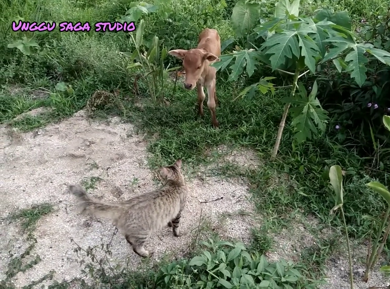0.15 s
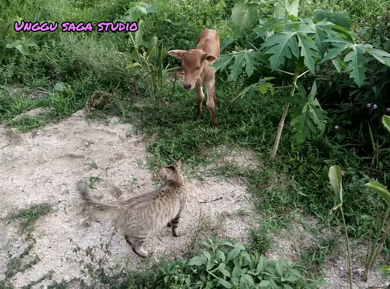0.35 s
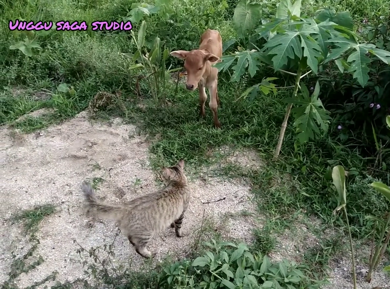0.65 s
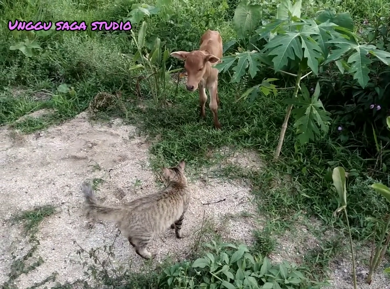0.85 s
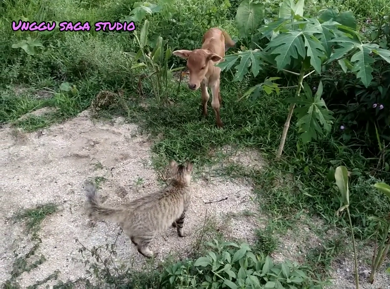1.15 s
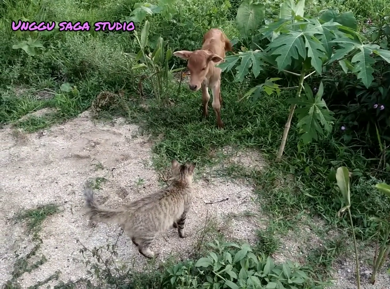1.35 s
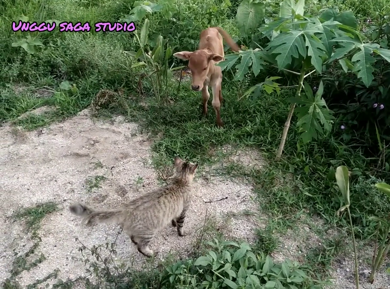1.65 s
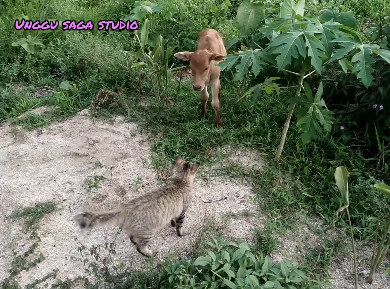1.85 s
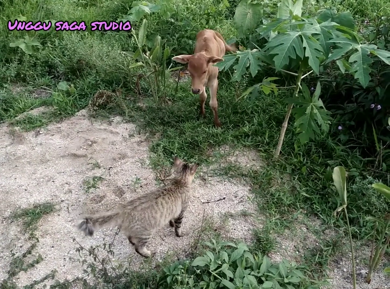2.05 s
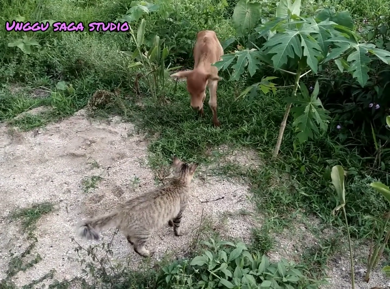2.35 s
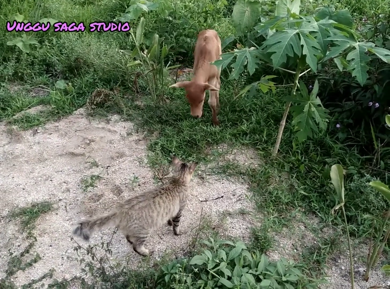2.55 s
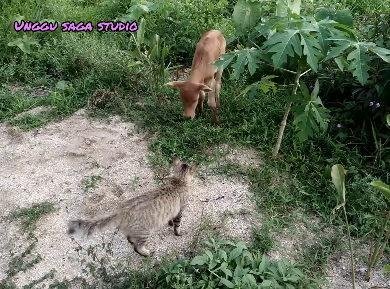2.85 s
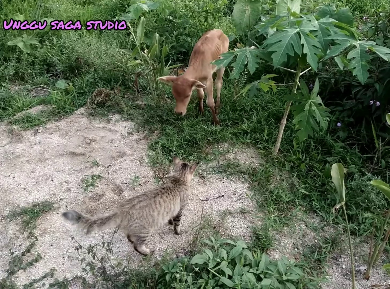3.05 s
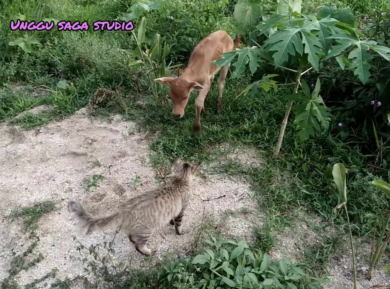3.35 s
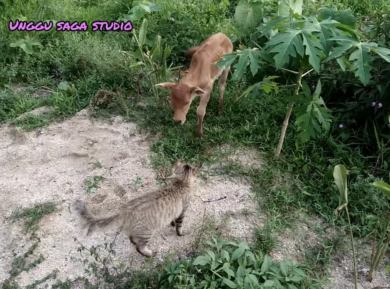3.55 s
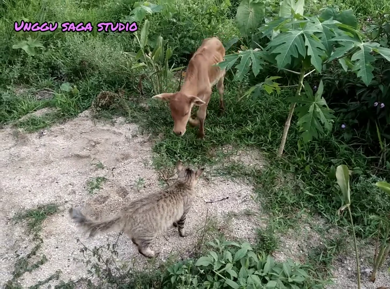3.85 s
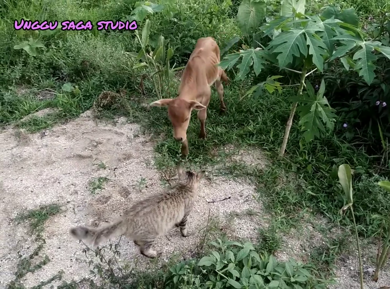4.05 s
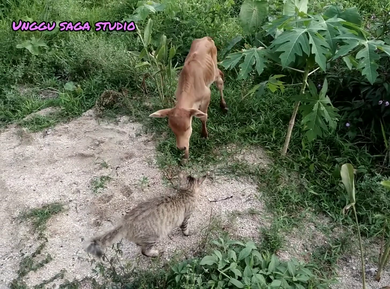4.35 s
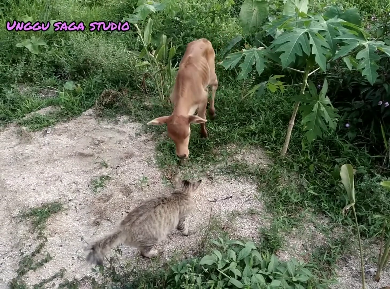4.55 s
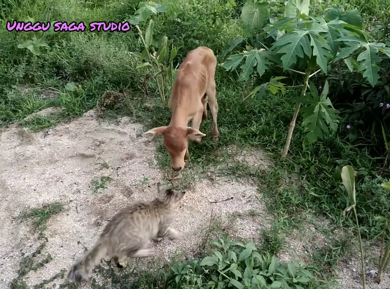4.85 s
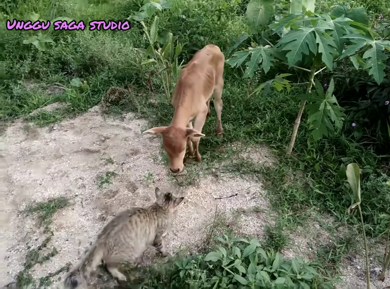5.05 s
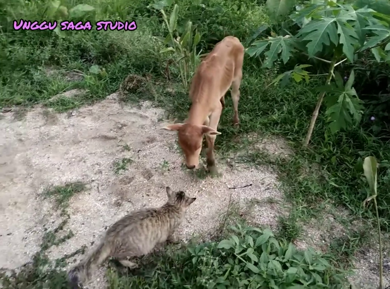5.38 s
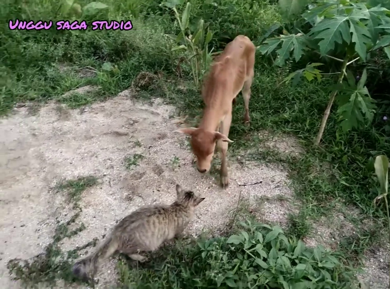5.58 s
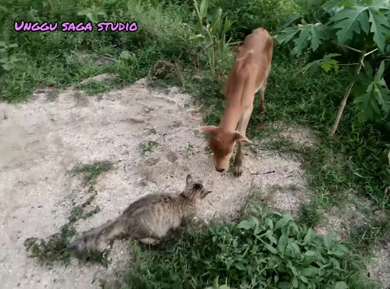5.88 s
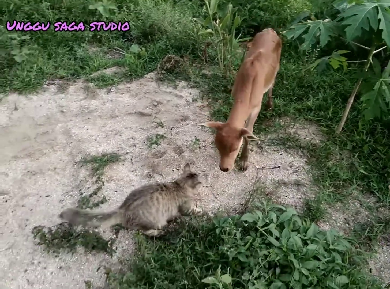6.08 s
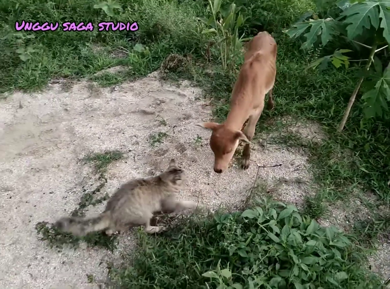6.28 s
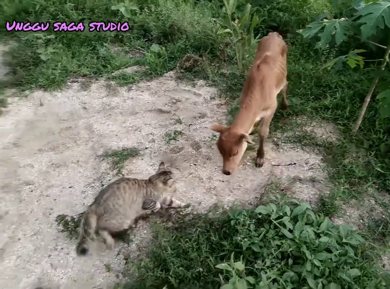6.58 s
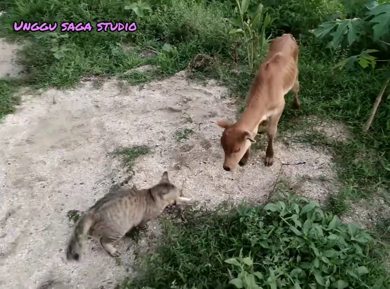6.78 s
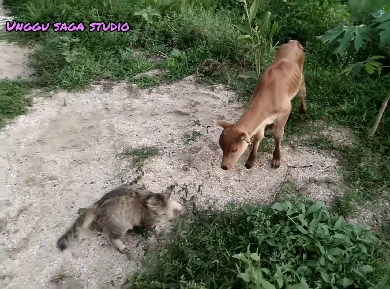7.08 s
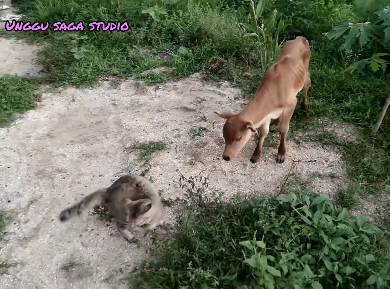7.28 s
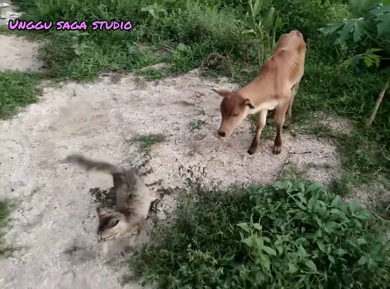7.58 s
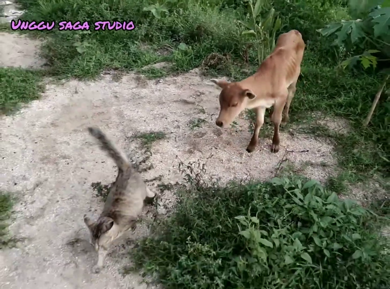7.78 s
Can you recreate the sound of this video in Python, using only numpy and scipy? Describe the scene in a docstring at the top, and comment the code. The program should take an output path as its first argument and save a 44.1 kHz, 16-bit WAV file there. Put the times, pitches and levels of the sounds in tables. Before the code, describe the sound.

Dense high insect trilling fills an open weedy yard, with faint bird chips and rustling weeds, then gravelly scrapes and sharp little clicks.

```python
"""Tree crickets drone in a grassy yard: wings ring at rising pitches with a shrill fourth harmonic, then stutter.
Behind them noise strands blur into a chorus, a katydid's toothed file buzzes and shaped noise makes fizz and air.
Small birds chip in falling glides, blurred glides call from afar, and two close low notes beat as an engine.
Animals stir the weeds as random grains; near the end a cat and a calf scuff sand, with resonant gravel and
sharp clicks."""
import sys
import numpy as np
from scipy import signal
from scipy.fft import rfft, irfft, next_fast_len
from scipy.io import wavfile

SR = 44100
rng = np.random.default_rng(int(sys.argv[2]) if len(sys.argv) > 2 else 0)


def store_wav(level_fs):
    """Save 16-bit WAV to argv[1]."""
    pcm = np.round(np.clip(np.atleast_2d(level_fs), -1, 1) * 32767)
    wavfile.write(sys.argv[1], SR, pcm.T.astype(np.int16))


N = 349568
TIME = np.arange(N) / SR
BINS = np.fft.rfftfreq(N, 1 / SR)

# Spectrum of rubbed sand and cracking grit. Each row: frequency in Hz, relative level in dB.
SAND_SPECTRUM = [(100, -9), (450, -8), (680, -3), (900, 4.5), (1400, 2), (2050, 6.5), (2900, 4.5),
                 (3700, -10.5), (4800, -31), (6100, -32), (7200, -1), (13500, -15)]
# Spectrum of crunching and snapping stalks. Each row: frequency in Hz, relative level in dB.
STALK_SPECTRUM = [(150, -8), (500, -8), (800, -8), (1300, 0.5), (2800, 6.5), (3600, 7), (4250, 1.5),
                  (4700, -1.5), (5400, -8), (6100, -16), (7000, -20), (11000, -51)]


def amp(db):
    """Level to amplitude: 20 dB is a factor of ten."""
    return 10 ** (np.asarray(db) / 20)


def unit(x):
    """Normalization of the mean power: scales to rms 1."""
    return x / np.sqrt(np.mean(abs(x) ** 2) + 1e-20)


def curves(rows):
    """Linear interpolation in time: the columns of a table at every sample."""
    s, *columns = np.transpose(rows)
    return [np.interp(TIME, s, c) for c in columns]


def colour(rows):
    """Interpolation over log frequency: the columns of a table at every bin."""
    hz, *columns = np.transpose(rows)
    return [np.interp(np.log(BINS + 1), np.log(hz + 1), c) for c in columns]


def pan(lean_db):
    """Interaural level difference: left and right gains for a left-minus-right level."""
    return amp(np.array([[.5], [-.5]]) * lean_db)


def add(mix, s, sound):
    """Superposition: mixes a sound in at time s."""
    part = mix[..., max(round(s * SR), 0):][..., :sound.shape[-1]]
    part += sound[..., :part.shape[-1]]


def drift(width_hz):
    """Narrowband fluctuation: low-passed complex noise of rms 1, independent in each ear."""
    rate_hz = 12 * width_hz  # a coarse sampling suffices for slow noise
    hz = np.fft.fftfreq(next_fast_len(int(rate_hz * N / SR) + 8), 1 / rate_hz)
    z = rng.standard_normal((2, len(hz))) + 1j * rng.standard_normal((2, len(hz)))
    z = np.fft.ifft(z / (1 + (hz / width_hz) ** 4))
    return unit(np.array([np.interp(TIME * rate_hz, np.arange(len(hz)), ear) for ear in z]))


def turn(hz):
    """Phase is the integral of frequency: a unit phasor that follows a pitch curve."""
    return np.exp(2j * np.pi * np.cumsum(hz * np.ones(N)) / SR)


def tinted(x, gain):
    """Linear filtering: multiplies the spectrum by a gain at every frequency."""
    return irfft(rfft(x) * gain, N)


def bed(rows, swell_db):
    """Diffuse field: noise of a given spectral density whose ears correlate only at low frequencies."""
    # Each row: frequency in Hz, correlation between the ears.
    likeness = [(30, 0.25), (90, 0.86), (200, 0.38), (600, 0.41), (1200, 0), (15000, 0)]
    db, lean_db = colour(rows)
    same = np.clip(colour(likeness)[0], -1, 1)
    a, b = rfft(rng.standard_normal((2, N)))
    z = np.array([a, same * a + np.sqrt(1 - same ** 2) * b])
    noise = irfft(z * amp(db) * pan(lean_db), N) * np.sqrt(SR / 2)  # density to amplitude
    return noise * amp(swell_db * drift(10.2)[0].real)


def air():
    """Broadband ambient noise: still air and far leaves, gently fluctuating."""
    # Each row: frequency in Hz, density in dB per Hz before the swell, left-right difference in dB.
    density = [(20, -114, 11), (44.2, -94, -2), (111, -87, 6), (209, -91.5, 5), (423, -92.5, 5.5),
               (590, -94, -2), (944, -94, 1.5), (1456, -99, 1), (2250, -91, 11), (2420, -93.5, 22),
               (2860, -101, 5.5), (3230, -101, -3.5), (4300, -106, -2.5), (4540, -100, 9.5),
               (5000, -102, -4.5), (6000, -116, 5)]
    return bed(density, swell_db=1.4)


def engine(waver=0.27, whine_hz=935, whine_db=-72.0):
    """Beating: two close low notes throb at their difference frequency under a blurred whine."""
    # Each row: frequency in Hz, level in dB relative to the engine's level.
    low_notes = [(76.6, -9.5), (87.2, -3.5)]
    start_db, approach_db_per_s = -66.5, 0.93
    notes = sum(amp(db) * turn(hz) * (1 + waver * drift(1.8)) for hz, db in low_notes) * pan(3.7)
    whine = turn(whine_hz) * drift(50) * amp(whine_db + 2.3 * drift(3).real)
    return (notes * amp(start_db + approach_db_per_s * TIME) + whine).real


def far_calls():
    """Spectral blurring by distance: evenly repeated gliding calls, modulated by narrowband noise."""
    # Far birds and farm animals. Each row: start in seconds, number of calls, gap between starts in seconds,
    # length in seconds, first pitch in Hz, last pitch in Hz, level in dB, blur width in Hz.
    calls = [(0, 2, 0.367, 0.18, 556, 540, -62, 55), (0.1, 3, .45, 0.4, 1298, 1447, -62.5, 130),
             (1.299, 1, 1, 2.2, 5000, 5200, -67.5, 350), (2.1, 1, .9, .95, 3230, 3680, -68, 110),
             (2.13, 2, .18, .15, 2850, 2720, -59, 170), (2.76, 1, .2, .14, 2680, 2850, -58, 150),
             (3.17, 1, .2, .13, 3400, 3300, -63, 170), (3.21, 1, .2, .14, 2950, 2720, -56, 150),
             (4.64, 1, .6, .4, 290, 205, -64, 20), (4.68, 1, .6, .55, 565, 325, -59.5, 38),
             (5.356, 2, .345, .135, 552, 547, -61, 70)]
    out = np.zeros((2, N))
    for s, count, gap, length, first_hz, last_hz, db, blur_hz in calls:
        blur = drift(blur_hz)
        for k in range(round(count)):
            u = np.clip((TIME - s - k * gap) / length, 0, 1)
            glide = turn(first_hz + (last_hz - first_hz) * u)
            out += amp(db) * np.sin(np.pi * u) * (blur * glide).real
    return out


def leaves(x, wet_db, t60):
    """Exponential decay of scattered energy: a short reverberation off leaves and ground."""
    t = np.arange(SR // 2) / SR
    tail = rng.standard_normal((2, len(t))) * amp(-60 * t / t60)
    tail /= np.linalg.norm(tail[0])
    return amp(wet_db) * signal.fftconvolve(x, tail, axes=1)[:, :N]


def birds(length=0.019, fall_hz=950, near_db=-48.5, stretch=.09):
    """Direct-to-scattered ratio: fast falling chips grow along a phrase; faint ones sit deeper in the bushes."""
    # Each row: start in seconds, number of chips, level of the first chip in dB before
    # the direct and scattered shares, starting pitch in Hz.
    phrases = [(2.04, 1, -61, 5600), (2.507, 1, -50.5, 5780), (2.696, 2, -50, 5800),
               (2.851, 3, -50.5, 5800), (4.05, 1, -60, 5450), (4.266, 2, -55.5, 5480),
               (4.513, 2, -57.5, 5500), (6.372, 2, -56.5, 5560), (6.615, 2, -56, 5580),
               (6.858, 2, -56.5, 5560), (7.092, 2, -56.5, 5600), (7.372, 2, -56.5, 5560)]
    gap_s, growth_db = .036, 3  # from chip to chip
    direct, scattered = np.zeros(N), np.zeros(N)
    for s, count, first_db, hz in phrases:
        for k in range(round(count)):
            t = np.arange(0, length * (1 + stretch * k), 1 / SR)
            db, fall = first_db + k * growth_db, fall_hz * rng.uniform(0.86, 1.22)
            phase = 2 * np.pi * np.cumsum(hz - fall * t / length) / SR
            chip = amp(db) * np.hanning(len(t)) * np.sin(phase)
            clear = np.clip(amp(db - near_db), 0, 1) ** 2  # louder chips reach the ear more directly
            add(direct, s + k * gap_s, chip * clear)
            add(scattered, s + k * gap_s, chip * (1.35 - clear))
    return direct + leaves(scattered[None], wet_db=1.5, t60=.19)


def fizz():
    """Incoherent summation: countless small insects in the grass merge into shaped noise."""
    # Each row: frequency in Hz, density in dB per Hz before the swell, left-right difference in dB.
    density = [(5200, -135, 9), (6470, -114, 2), (6330, -94, 2), (7090, -101, -1.5), (7380, -85.5, 3),
               (7410, -101.5, -2), (8140, -89, 2), (8900, -85.5, 1), (9300, -81.5, -1.5), (11370, -88, 1),
               (11350, -106, -3), (13500, -108, 15.5), (14800, -104, 18)]
    return bed(density, swell_db=1.63)


def katydid(stroke_db=-4.0, scatter_db=-3.5, jitter_hz=70, uneven_db=1.5):
    """Stridulation: file strokes whistle and fall ever faster; shaped noise stands for their scatter in grass."""
    # Colour of the buzz and its hiss. Each row: frequency in Hz, gain in dB, left-right difference in dB;
    # the direct strokes take only the difference.
    hiss_colour = [(9200, -45, 0), (10150, -11, 1.9), (10500, -4.5, 6), (10880, -4.5, 16.5),
                   (11260, -1, 8.5), (11560, -14.5, 7), (12400, -34, 7), (13100, -77, 12)]
    # Each row: time in seconds, level in dB before the stroke and scatter shares.
    loudness = [(0, -48.5), (4.4, -48), (5, -47.5), (5.75, -48.5), (6.15, -49.5), (6.5, -48), (6.8, -47),
                (7.3, -46.5), (7.93, -47.5)]
    rate_hz, stroke_s = 136.9, .0037
    top_hz, drop_hz = 11390, 1753
    cycles = np.cumsum(rate_hz + .3 * drift(3)[0].real) / SR
    number = cycles.astype(int)
    detune, size, start = rng.standard_normal((number[-1] + 1, 3))[number].T
    u = np.minimum(cycles % 1 / rate_hz / stroke_s, 1)  # progress of a stroke, then silence
    pitch_hz = top_hz + jitter_hz * detune - drop_hz * u ** 2
    whistles = (turn(pitch_hz) * np.exp(2j * np.pi * start)).real
    db, lean_db = colour(hiss_colour)
    direct = unit(tinted(whistles * np.sin(np.pi * u) * amp(uneven_db * size), pan(lean_db)))
    scatter = unit(tinted(rng.standard_normal((2, N)), amp(db) * pan(lean_db)))
    return (amp(stroke_db) * direct + amp(scatter_db) * scatter) * amp(curves(loudness)[0])


def granular(grains_per_s, hiss, lumpy_db):
    """Shot noise: sparse random grains over a steady hiss, partly shared by the ears, in uneven clumps."""
    grains = rng.standard_normal((3, N)) * (hiss + (rng.random((3, N)) < grains_per_s / SR))
    return (grains[:2] + grains[2]) * amp(lumpy_db * drift(45)[0].real)


def rubbing(spectrum, grains_per_s, hiss, lumpy_db):
    """Friction noise: clumps of tiny grains filtered by the material, rms 1."""
    return unit(tinted(granular(grains_per_s, hiss, lumpy_db), amp(colour(spectrum)[0])))


def strokes(rows):
    """Amplitude envelope: the force of each stroke of a foot over time."""
    force = np.zeros(N)
    for s, length, db in rows:
        add(force, s, amp(db) * signal.windows.tukey(int(length * SR), .4))
    return force


def rustle():
    """Friction in vegetation: stalks crunch and fine blades brush as the animals move."""
    # The calf and the cat brush through the weeds. Each row: start in seconds, length in seconds,
    # level of stalks in dB, level of fine blades in dB, both before the faint constant stir and the panning.
    brushes = [(1.622, 0.27, -66, -63), (2.36, 0.48, -74, -68), (3.174, 0.27, -66, -66),
               (3.385, 0.11, -67, -61), (3.52, 0.43, -71, -67), (4.217, 0.6, -68, -69),
               (4.747, 0.34, -62.5, -63), (5.62, .14, -65, -65), (5.816, 0.66, -62.5, -66),
               (6.425, 0.3, -59.5, -64), (6.75, 0.39, -64, -70), (7.072, 0.17, -61.5, -61),
               (7.223, 0.26, -63, -72), (7.667, 0.35, -63, -72)]
    # Fine blades. Each row: frequency in Hz, relative level in dB.
    blade_spectrum = [(3000, -30), (6100, -18), (7000, 2), (9500, 4), (12500, 1), (14200, 0)]
    grazing_stalks_db, grazing_blades_db = -73, -87  # the faint stir between those moves
    s, length, stalks_db, blades_db = np.transpose(brushes)
    bend = np.hypot(strokes(zip(s, length, stalks_db)), amp(grazing_stalks_db))
    sweep = np.hypot(strokes(zip(s, length, blades_db)), amp(grazing_blades_db))
    stalks = rubbing(STALK_SPECTRUM, grains_per_s=1100, hiss=0.56, lumpy_db=3.5) * bend * pan(1)
    blades = rubbing(blade_spectrum, grains_per_s=960, hiss=0.34, lumpy_db=5.5) * sweep * pan(23.4)
    return stalks + blades


def thuds():
    """Damping by soft ground: hoof falls in turf give low, dull bursts of friction noise."""
    # Each row: start in seconds, length in seconds, level in dB before panning.
    falls = [(1.33, 0.16, -62), (1.77, 0.11, -67), (7.25, 0.094, -68)]
    # Turf. Each row: frequency in Hz, relative level in dB.
    turf_spectrum = [(60, -23), (150, 1.5), (240, -2.5), (400, -9), (700, -20), (2000, -40)]
    turf = rubbing(turf_spectrum, grains_per_s=980, hiss=0.6, lumpy_db=5.5)
    return strokes(falls) * turf * pan(3.8)


def scuffs():
    """Granular friction: paws and hooves rub over sand in short strokes."""
    # Each row: start in seconds, length in seconds, level in dB before panning.
    steps = [(6.3, 0.058, -57.5), (6.518, 0.069, -52), (6.68, 0.089, -62), (6.86, 0.23, -62.5),
             (7.08, 0.11, -59), (7.255, 0.11, -57), (7.33, .11, -56.5), (7.42, 0.17, -58.5),
             (7.6, 0.047, -54.5), (7.655, .06, -50.5), (7.725, 0.05, -54), (7.775, 0.043, -56),
             (7.83, 0.18, -56)]
    sand = rubbing(SAND_SPECTRUM, grains_per_s=700, hiss=0.095, lumpy_db=1.0)
    return strokes(steps) * sand * pan(5.1)


def resonate(x, hz, width_hz):
    """Resonance: a double pole, carried along a pitch curve, rms 1."""
    carrier, r = turn(hz), np.exp(-np.pi * width_hz / SR)
    shifted = signal.lfilter([1], [1, -2 * r, r * r], x / carrier)
    return unit((carrier * shifted).real)


def drag(slips_per_s=800, hiss=0.063, lumpy_db=1):
    """Stick-slip excitation: gravel under the turning cat's paw rasps in a rising and a hollow low resonance."""
    start_s, length_s, level_db = 7.252, .092, -47.3
    first_hz, rise_hz_per_s, width_hz = 1820, 8000, 500
    hollow_hz, hollow_width_hz, hollow_db = 890, 580, -5.5
    slips = granular(slips_per_s, hiss, lumpy_db)
    hz = first_hz + rise_hz_per_s * np.clip(TIME - start_s, 0, length_s)
    rasp = resonate(slips, hz, width_hz)
    hollow = amp(hollow_db) * resonate(slips, hollow_hz, hollow_width_hz)
    return (rasp + hollow) * strokes([(start_s, length_s, level_db)]) * pan(4)


def crack(spectrum):
    """Minimum phase: the folded cepstrum packs a given spectrum into one sharp click, peak 1."""
    cepstrum = irfft(colour(spectrum)[0] * np.log(10) / 20, N)
    cepstrum[1:N // 2] *= 2
    cepstrum[N // 2:] = 0
    click = irfft(np.exp(rfft(cepstrum)), N)[:SR // 20]
    return click / abs(click).max()


def ticks():
    """Impulsive fracture: grains of grit crack dully and stalks snap brightly."""
    # Each row: time in seconds, peak level in dB before panning, brightness from 0 (grit) to 1 (stalk).
    snaps = [(6.145, -34, 0.84), (6.235, -43, .3), (6.248, -44, .3), (6.327, -42, 0), (6.331, -40, .2),
             (6.528, -37, .4), (6.541, -34, 0.43), (6.55, -40, .3), (6.556, -37, .2), (6.565, -39, 0),
             (6.577, -42, .1), (6.724, -44, .1), (6.942, -41, .4), (6.99, -40, .2), (7.14, -37, .2),
             (7.264, -38, 0), (7.284, -39, .1), (7.299, -39, .1), (7.312, -41, .1), (7.329, -39, .2),
             (7.501, -43, .1), (7.561, -42, 0), (7.68, -35.5, 0.24), (7.702, -43, 0), (7.787, -43, 0),
             (7.806, -33.5, 0.25), (7.848, -48, .1)]
    out, grit, stalk = np.zeros(N), crack(SAND_SPECTRUM), crack(STALK_SPECTRUM)
    for s, db, bright in snaps:
        click = (1 - bright) * grit + bright * stalk
        add(out, s, amp(db) * click / abs(click).max())
    return out * pan(3)


def chorus(whistle_db=1, overtone_db=0.0, right_db=-15, skirt_db=-18, patchy_db=8.0, count=9):
    """Narrowband noise from many sources: whistles blur into one band, harmonics stay as fading strands."""
    # The far singers together. Each row: time in seconds, level in dB of the whistle band before
    # whistle_db and right_db are added, level in dB of the strands.
    loudness = [(0, -48, -49.5), (1.4, -51.5, -54), (2.3, -48, -53), (3.2, -54.5, -53), (4.4, -54, -52),
                (5.4, -53, -51), (6.2, -50.5, -49.5), (7.93, -51.5, -46)]
    strand_width_hz = 16
    hz = 2222 + 13 * TIME  # a rise of 13 Hz per second
    low_db, high_db = curves(loudness)
    band = drift(100) + amp(skirt_db) * drift(300)
    whistle = turn(hz) * band * amp(low_db + whistle_db) * amp([[0], [right_db]])
    strands = 0
    for ratio in np.linspace(.955, 1.035, count):
        strand = turn(4 * hz * ratio) * drift(strand_width_hz)
        strands = strands + strand * amp(patchy_db * drift(2.4).real)
    return (whistle + unit(strands) * amp(high_db + overtone_db)).real


def pips(length=.055, overtone_db=-3, rise_hz_per_s=1100, uneven_db=1.4):
    """Frequency-modulated pulses: crickets stutter in runs of short rising notes with a fourth harmonic."""
    # Later runs slow as the two nearest singers wind down. Each row: centre of the first pip in seconds,
    # number of pips, gap in seconds, mean pitch in Hz, mean level in dB before panning.
    runs = [(.012, 2, 0.058, 2360, -58), (.232, 2, .112, 2328, -64), (.482, 5, 0.15, 2336, -59),
            (1.437, 1, .2, 2334, -58.5), (1.17, 2, .43, 2065, -60), (1.78, 4, 0.174, 2085, -59),
            (2.62, 4, 0.16, 2090, -59), (3.46, 4, .35, 2080, -61), (4.93, 3, 0.43, 2070, -61),
            (5.876, 13, 0.062, 2317, -56.5), (6.73, 6, .089, 2313, -57), (7.298, 6, .111, 2322, -57),
            (6.24, 9, 0.058, 2391, -58), (6.783, 7, .074, 2388, -58.5), (7.305, 7, .094, 2391, -56.5)]
    out, t = np.zeros((2, N)), np.arange(0, length, 1 / SR)
    for s, count, gap, hz, db in runs:
        for k, (detune, size) in enumerate(rng.standard_normal((round(count), 2))):
            pitch_hz = hz * (1 + 0.0032 * detune) + rise_hz_per_s * (t - length / 2)
            phase = 2 * np.pi * np.cumsum(pitch_hz) / SR
            note = np.sin(phase) * pan(19.7) + amp(overtone_db) * np.sin(4 * phase)
            pip = amp(db + uneven_db * size) * np.hanning(len(t)) * note
            add(out, s + k * gap - length / 2, pip)
    return out


def singer(row, swell_db, right_db=-16, above_db=-25, below_db=-10.5, lag=2.04):
    """Harmonics and sidebands: a wing rings at a rising pitch and its fourth harmonic, rippled and scattered."""
    attack_s, release_s, ripple_hz = 0.18, 0.17, 280
    flutter, scatter = .035, .3  # random share of the whistle, and of the overtone among swaying leaves
    start, end, first_hz, rise, bend, low_db, high_db = row
    age = TIME - start
    gate = np.clip(age / attack_s, 0, 1) * np.clip((end - TIME) / release_s, 0, 1)
    wing = turn(first_hz + rise * age + bend * age ** 2)
    ripple = turn(ripple_hz)
    # The ripple puts a side tone above the whistle and one below the overtone.
    whistle = wing * (1 + amp(above_db) * ripple) * (1 + flutter * drift(25)) * amp(low_db + swell_db[0])
    overtone = wing ** 4 * (1 + scatter * drift(10) + amp(below_db) * drift(9.5) / ripple)
    overtone = overtone * amp(high_db + swell_db[1])
    # The overtone reaches the right ear lag radians later in its cycle, the whistle half as much.
    ears = np.exp(-1j * lag * np.array([[0], [1]]))
    return gate * (np.sqrt(ears) * whistle * amp([[0], [right_db]]) + ears * overtone * pan(-1.7)).real


def crickets(sway_db=2, sway_hz=1.2):
    """Interference of near tones: three nearest crickets swell and beat; the rest waver behind leaves."""
    # The first three are the nearest. Each row: start in seconds, end in seconds, first pitch in Hz,
    # rise in Hz per second, bend of the rise in Hz per second squared, then the levels in dB of
    # whistle and overtone before their swells and ear gains.
    songs = [(.5, 6.15, 2255.4, 11.4, .14, -44, -45.2), (1.65, 6.25, 2310.8, 34.8, -3.25, -46.5, -49.6),
             (4.5, 8.2, 2160.9, 12.9, .4, -52, -53.5), (-.2, 6.3, 2166.8, 16.4, -.77, -55.5, -58),
             (-.2, 4.85, 2203.4, 14.7, -.33, -53.5, -55), (2.3, 6.15, 2155.5, 8.4, -.5, -61, -53.5)]
    # Swells of the three nearest: the first comes and goes, the second eases off, the third sinks back.
    # Each row: time in seconds, whistle change in dB, overtone change in dB.
    lead_swell = [(.85, 0.5, -1.5), (2.2, -3, -3), (3.05, -2, -1), (3.3, -12, -3), (3.55, -18, -5),
                  (3.75, -4, 2), (4.3, 0, -1), (4.55, 0, -4), (5, 4, -4.5), (5.45, -0.5, -1.5),
                  (5.85, -15, -0.5)]
    # The same columns: time in seconds, whistle change in dB, overtone change in dB.
    second_swell = [(1.85, 0, -2), (2.45, 3.5, -2), (3.05, 0, 4), (3.55, .5, -6), (4.2, 0, 0),
                    (4.9, -4, 0.5), (5.25, -6.5, 6.5), (5.65, -0.5, -4), (6.1, -4, 0)]
    # The same columns: time in seconds, whistle change in dB, overtone change in dB.
    third_swell = [(4.7, 0, 0), (5.1, 1.5, 1.5), (5.5, -1.5, 0), (6, 2, 0), (6.3, 0, 1.5), (6.5, -7, 0),
                   (6.75, -1, 0), (7, -4, -3), (7.3, -2, -1), (7.6, -6, -3), (7.9, -6, 1)]
    first, second, third, *others = songs
    near = singer(first, curves(lead_swell))
    near = near + singer(second, curves(second_swell), above_db=-20.5)
    near = near + singer(third, curves(third_swell))
    return near + sum(singer(row, sway_db * drift(sway_hz).real) for row in others)


def scene():
    """Superposition of the distance, the animals' steps and the insects."""
    distance = air() + engine() + far_calls() + birds()
    sand = scuffs() + drag() + ticks()
    ground = rustle() + thuds() + sand + leaves(sand, wet_db=-10.0, t60=0.14)
    insects = fizz() + katydid() + chorus() + pips() + crickets()
    return distance + ground + insects


def record(dry):
    """Band limitation: a steep linear-phase low-pass removes the extreme treble."""
    edge_hz = 14290
    lowpass = signal.firwin(801, edge_hz, window=("kaiser", 8), fs=SR)
    return signal.oaconvolve(dry, lowpass[None], "same")


dry = scene()
out = record(dry)
store_wav(out)
```